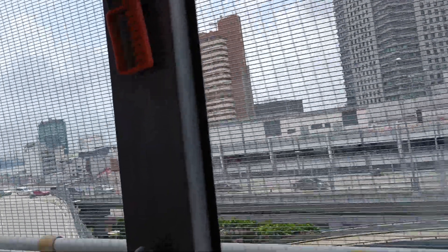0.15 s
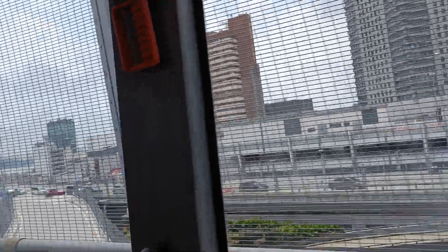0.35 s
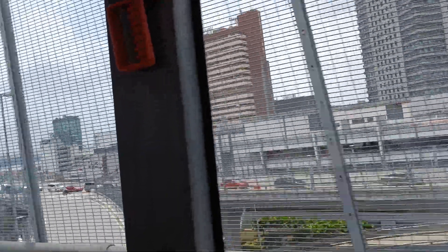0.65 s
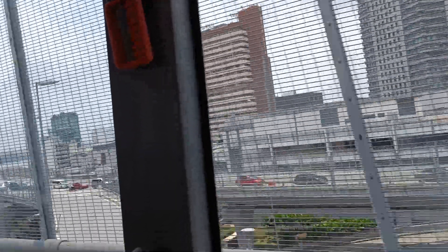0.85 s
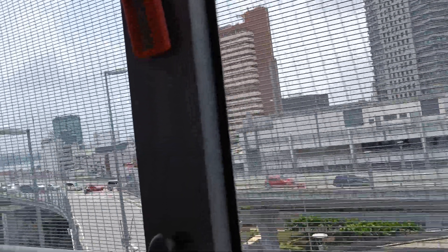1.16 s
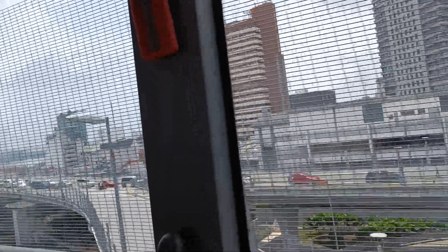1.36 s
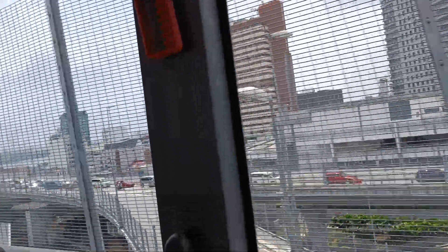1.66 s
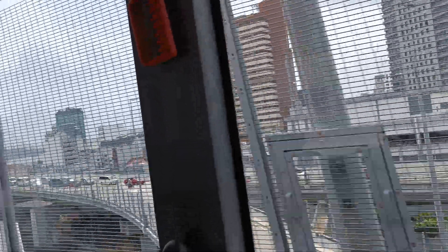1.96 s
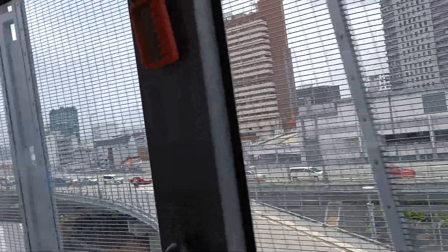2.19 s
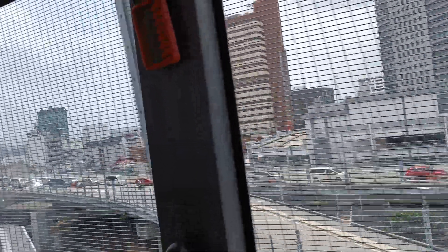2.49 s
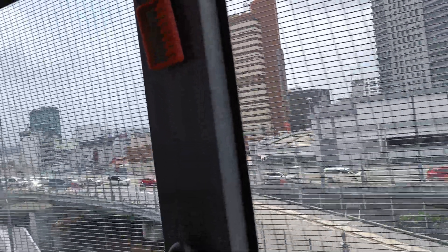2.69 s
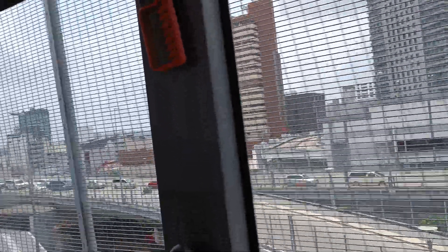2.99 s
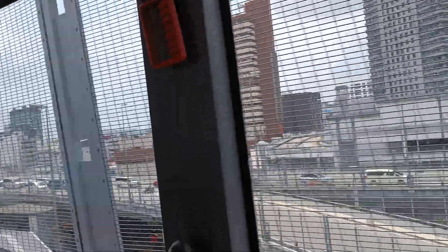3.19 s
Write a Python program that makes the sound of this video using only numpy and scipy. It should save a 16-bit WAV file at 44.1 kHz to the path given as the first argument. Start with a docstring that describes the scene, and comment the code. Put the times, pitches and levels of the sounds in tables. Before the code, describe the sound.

Inside a moving bus, a diesel engine hums steadily, slides down in pitch at a gear change, then holds low and slowly rises, with tyre rumble and small window rattles; stereo microphones in the cabin.

```python
"""Inside a moving bus: a six-cylinder diesel drops its revs at a gear change, then pulls again.
The engine is a stack of wavering sines on the firing cycle, lifted where the cabin booms; gear, turbo and
two more thin tones are single sines. Suspension, drone, tyres, body and air are shaped noise, and panels
are noise sung through narrow resonances. A small fitting and loose window frames rattle as clusters of
contacts with a short cabin echo. Two microphones differ in colour and phase."""
import sys
import numpy as np
from scipy import signal
from scipy.fft import rfft, irfft, next_fast_len
from scipy.io import wavfile
from scipy.ndimage import uniform_filter1d, map_coordinates

SR = 44100
rng = np.random.default_rng(int(sys.argv[2]) if len(sys.argv) > 2 else 0)


def undo_db(level):
    """Turn decibels back into plain size, where 20 dB means ten times bigger."""
    steps = np.asarray(level, float) / 20
    return 10 ** steps


def inscribe(sig):
    """Save sig as 16-bit PCM at rate SR to the path in sys.argv[1].

    A 1-D sig is mono; a 2-D sig holds one channel per row.
    Samples are clipped to [-1, 1] before scaling.
    """
    pcm = np.round(np.clip(np.atleast_2d(sig).T, -1, 1) * 32767)
    wavfile.write(sys.argv[1], SR, pcm.astype(np.int16))


N = 147294
CYLINDERS = 6


def unit(x):
    """Scaled to rms 1."""
    return x / np.sqrt(np.mean(x ** 2) + 1e-20)


def along(points, hz):
    """Reads (Hz, value) points on a log frequency axis."""
    f, v = np.transpose(points)
    return np.interp(np.log(hz + 1), np.log(f + 1), v)


def curves(rows):
    """One value per sample for each column after the time."""
    s, *cols = np.transpose(rows)
    return [np.interp(np.arange(N) / SR, s, c) for c in cols]


def wobble(rate):
    """A smooth random curve, rate knots a second."""
    return map_coordinates(rng.standard_normal(400), [np.arange(N) * rate / SR])


def filtered(x, response):
    """x shaped by a complex response of frequency."""
    m = next_fast_len(N + SR // 2)
    return irfft(rfft(x, m) * response(np.fft.rfftfreq(m, 1 / SR)), m)[..., :N]


def resonance(f, hz, width_hz):
    """One causal resonance, gain 1 at its centre."""
    return 1j * f * width_hz / (hz * hz - f * f + 1j * f * width_hz)


def right_over_left(db):
    """Left and right gains, db apart and balanced about the middle."""
    return undo_db([[-db / 2], [db / 2]])


def pair_of(alike):
    """Two white noises that are partly the same."""
    a, b = rng.standard_normal((2, N))
    alike = np.clip(alike, 0, 1)
    return np.array([a, alike * a + np.sqrt(1 - alike ** 2) * b])


# Left-right likeness of the noise beds and panels: pitch_hz, likeness (1 = the same)
LIKENESS = [(20, .99), (45, .99), (70, .97), (125, .94), (250, .92), (500, .8), (900, .62), (1300, .5),
            (2000, .25), (4000, .08), (15000, .05)]


def rush(spectrum, patchy_db):
    """Stereo noise of a given spectrum, middle at rms 1, with time-frequency patches of random gain."""
    z = signal.stft(rng.standard_normal((2, N)), nperseg=512)[2]
    field = uniform_filter1d(rng.standard_normal(z.shape[1:]), size=6, axis=0)
    field = uniform_filter1d(field, size=12, axis=1)
    pair = signal.istft(z * undo_db(patchy_db * unit(field)), nperseg=512)[1][:, :N]

    def middle_and_side(hz):
        # the less alike the ears are, the more side signal
        width = np.tan(np.arccos(np.clip(along(LIKENESS, hz), -1, 1)) / 2)
        return undo_db(along(spectrum, hz)) * np.array([np.ones_like(width), width])

    mid, side = filtered(pair, middle_and_side)
    return np.array([mid + side, mid - side]) / np.std(mid)


# Revs and load through the gear change: time_s, firing_hz, loaded_orders_db,
# growl_db (orders 7 to 13, from just above the firing rate to about twice it)
REVS = [(0, 96.65, -20, -19.5), (.2, 96.65, -17.5, -21.5), (.36, 96.24, -23.5, -19),
        (.46, 91.04, -26.5, -16), (.62, 88.1, -23, -15.5), (.7, 84.84, -28.5, -15.5),
        (.79, 78.66, -28, -12.5), (.9, 70.5, -21.5, -19.5), (1.3, 69.48, -22, -20.5),
        (1.68, 69.19, -18.5, -22.5), (1.9, 69.25, -25, -30), (2.06, 68.55, -16.5, -18.5),
        (2.3, 69.06, -29, -23.5), (2.7, 69.48, -23, -37), (3.0, 71.22, -25.5, -22.5),
        (3.34, 74.05, -23, -23)]


def revs():
    """Firing rate, phase of the four-stroke cycle (one turn per six firings), and the two order levels."""
    firing_hz, tone_db, growl_db = curves(REVS)
    cycle = 2 * np.pi * np.cumsum(firing_hz) / SR / CYLINDERS
    return firing_hz, cycle, tone_db, growl_db


# Strength of each engine order: multiple of the four-stroke cycle, level_db
ORDER_LEVELS = {5: -9.5, 6: -1.5, 7: -15.5, 8: -12, 9: -4.5, 10: -6, 11: -7.5, 12: -4.5, 13: -8.5, 15: -12,
                18: -5.5, 24: -21}
# Booms of the cabin: pitch_hz, boost_db
CABIN_BOOMS = [(30, -18), (70, 1), (100, 0.5), (135, -8), (200, -3.34), (215, -7.5), (290, 2), (340, 0.7),
               (650, -3.7)]


def engine(cycle, firing_hz, tone_db, growl_db):
    """Each order of the uneven firing cycle wavers on its own and is lifted by the cabin's booms."""
    growling = range(7, 14)
    firing_waver_db, other_waver_db, jitter_rad = 1, 2.2, 0.2
    out = np.zeros((2, N))
    for k, order_db in ORDER_LEVELS.items():
        load_db = growl_db if k in growling else tone_db
        boom_db = along(CABIN_BOOMS, k * firing_hz / CYLINDERS)
        waver_db = firing_waver_db if k == CYLINDERS else other_waver_db
        gain = undo_db(load_db + order_db + boom_db + waver_db * wobble(9))
        phase = k * cycle + rng.uniform(0, 2 * np.pi)
        phase = phase + jitter_rad * k / CYLINDERS * wobble(5.374)
        apart = 0.021 * k * wobble(1.5)  # left and right drift apart in phase, rad
        out += np.sqrt(2) * gain * np.sin([phase + apart, phase - apart])
    return out


def whine(rows, waver_hz, flicker_db, right_db):
    """A thin tone, unsteady in pitch and level."""
    hz, db = curves(rows)
    phase = 2 * np.pi * np.cumsum(hz + waver_hz * wobble(28.24)) / SR
    level = np.sqrt(2) * undo_db(db + flicker_db * wobble(20))
    return level * np.sin(phase) * right_over_left(right_db)


# Gear whine, dying as the load is lifted: time_s, pitch_hz, level_db
GEAR_WHINE = [(0, 1109, -47), (.12, 1108, -41), (.29, 1103, -40), (.33, 1110, -55), (.6, 1110, -70)]


def gear():
    """Whine of the gears as one unsteady sine, mostly on the right."""
    return whine(GEAR_WHINE, waver_hz=4, flicker_db=4.5, right_db=15)


# Turbo whistle, falling later than the revs: time_s, pitch_hz, level_db
TURBO_WHISTLE = [(0, 13050, -90), (.35, 13200, -84), (.8, 12880, -86), (1.3, 12150, -85), (1.9, 11210, -83),
                 (2.2, 10950, -81), (2.9, 10975, -76.5), (3.34, 11030, -85)]


def turbo():
    """Faint high whistle of the turbo, gliding down, stronger on the left."""
    return whine(TURBO_WHISTLE, waver_hz=6, flicker_db=4.5, right_db=-5)


# Two thin tones, perhaps fan or pump: time_s, pitch_hz, level_db
UPPER_THIN_TONE = [(0, 1800, -48.5), (.3, 1778, -42.5), (.42, 1792, -50), (.6, 1788, -45.5), (1, 1757, -53),
                   (2.3, 1786, -58.5), (3.34, 1778, -42.5)]
LOWER_THIN_TONE = [(0, 1609, -55.5), (.8, 1595, -55.5), (2.3, 1636, -57), (3.34, 1594, -53)]


def thin_tones():
    """Two gently wavering sines, the upper near the middle and the lower to the right."""
    upper = whine(UPPER_THIN_TONE, waver_hz=3, flicker_db=2.5, right_db=0.5)
    return upper + whine(LOWER_THIN_TONE, waver_hz=3, flicker_db=1.5, right_db=13)


# Level of the suspension thuds: time_s, level_db
JOLTS = [(0, -46.5), (.2, -36), (.8, -35.5), (1.3, -38), (1.5, -43), (1.66, -17.5), (1.8, -30),
         (2.08, -29.5), (2.4, -41), (3.34, -43)]
# Colour of a thud: pitch_hz, density_db (per Hz)
THUD_COLOUR = [(4, -120), (12, -20), (20, -5), (40, 0), (50, -14), (90, -120)]


def suspension():
    """Jolts of the suspension as patchy sub-bass noise that swells and falls."""
    return undo_db(curves(JOLTS)[0] + 1.7 * wobble(8)) * rush(THUD_COLOUR, patchy_db=2.5)


# Colour of the low body drone: pitch_hz, level_db
DRONE_COLOUR = [(30, -120), (42, -25), (52, -8), (65, 0), (90, -.5), (110, -6), (135, -35), (250, -120)]


def body_drone():
    """Low drone of the body as a narrow band of patchy bass noise."""
    return undo_db(-35 + wobble(4.8)) * rush(DRONE_COLOUR, patchy_db=3.5)


# Road noise: time_s, rumble_db (tyres), roar_db (body)
ROAD_LEVELS = [(0.0, -19.5, -32), (2.13, -26, -35.5), (3.34, -21, -32)]
# Colour of the tyre rumble: pitch_hz, density_db (per Hz)
RUMBLE_COLOUR = [(62, -37), (105, 0.5), (193, -2), (236, -10), (295, -4), (442, -15), (518, -14.5),
                 (574, -19.5), (631, -11.5), (700, -27.5), (910, -45), (1540, -120)]
# Colour of the body roar: pitch_hz, density_db (per Hz)
ROAR_COLOUR = [(240, -63.5), (400, 3.5), (582, -7.5), (637, -12.5), (698, -1.5), (1090, -9.5), (1180, -4.5),
               (1540, -12), (1830, -13), (2820, -23), (4500, -33.5), (5850, -43.5), (9900, -120)]


def tyres_and_body(cycle):
    """Low tyre rumble, and a body roar that throbs with the firing and half the firing rate."""
    rumble_db, roar_db = curves(ROAD_LEVELS)
    rumble = undo_db(rumble_db + 0.5 + 0.8 * wobble(8.6)) * rush(RUMBLE_COLOUR, patchy_db=0.8)
    throb_db = 0.5 * (np.sin(CYLINDERS * cycle) + 0.84 * np.sin(3 * cycle))
    roar = undo_db(roar_db + throb_db + 0.17 * wobble(4.4)) * rush(ROAR_COLOUR, patchy_db=0.5)
    return rumble + roar


# Colour of the air hiss: pitch_hz, density_db (per Hz)
AIR_COLOUR = [(1200, -120), (2000, -7.5), (2500, -3.5), (2900, -13.5), (4040, -5.5), (4600, -15),
              (6080, -9), (6780, -9.5), (7550, -20), (8700, -26), (9600, -29), (10700, -28), (12500, -26),
              (14400, -23), (15900, -34)]


def air():
    """Smooth hiss of air as treble noise, almost steady in level."""
    return undo_db(-54.5 + 0.4 * wobble(5.8)) * rush(AIR_COLOUR, patchy_db=0.4)


# Panel resonances: pitch_hz, width_hz, level_db
PANEL_MODES = [(527.8, 51, -43.5), (643.8, 16, -48), (863.5, 74, -52), (919.5, 9.8, -54),
               (1109.5, 67, -56.5)]
# Right over left for each panel in turn: balance_db
PANEL_BALANCE = [-3.5, 7.5, 1, 1.5, 14]
# Vibration driving all the panels: time_s, boost_db
PANEL_VIBRATION = [(0, 5), (.35, 9.5), (.7, 8.5), (1, 4), (2.2, 2), (2.8, 7.5), (3.34, 5.5)]


def panels():
    """Vibration noise ringing in narrow panel resonances, each wavering in level."""
    out = np.zeros((2, N))
    for (hz, width_hz, db), right_db in zip(PANEL_MODES, PANEL_BALANCE):
        noise = pair_of(along(LIKENESS, hz))
        ring = filtered(noise, lambda f: resonance(f, hz, width_hz) ** 2)
        out += undo_db(db + 0.56 * wobble(4.7)) * unit(ring) * right_over_left(right_db)
    return out * undo_db(curves(PANEL_VIBRATION)[0])


def contacts():
    """Tiny random clicks of loose parts touching, over a continuous buzz that the two sides partly share."""
    per_s, spread_db = 900, 2
    clicks = rng.random((2, N)) < per_s / SR
    clicks = clicks * undo_db(spread_db * rng.standard_normal((2, N))) * rng.choice([-1, 1], (2, N))
    return unit(clicks) + 0.5 * pair_of(0.7)


def ringing(x, modes):
    """x through a set of resonances of alternating sign, rolled off at the top, at rms 1."""
    def response(f):
        total = sum((-1) ** k * undo_db(db) * resonance(f, hz, width_hz)
                    for k, (hz, width_hz, db) in enumerate(modes))
        return total / (1 + (f / 7400) ** 16)
    return unit(filtered(x, response))


def burst(start_s, length_s):
    """Envelope of one rattle: a quick rise, a hold and a short fade."""
    t = np.arange(N) / SR
    rise = np.clip((t - start_s) / (0.055 * length_s), 0, 1)
    fade = np.clip((start_s + length_s - t) / (0.17 * length_s) + 0.19, 0, 1)
    return rise * fade


# Ticks of a smaller loose fitting: start_s, level_db, length_s
FITTING_TICKS = [(.349, -50, 0.019), (.627, -53, 0.008), (0.756, -50, 0.018), (0.948, -50, 0.03),
                 (1.151, -56, 0.031), (1.4, -56, .02), (3.199, -53, .008)]
# Resonances of the fitting: pitch_hz, width_hz, level_db
FITTING_MODES = [(2900, 800, -4), (3700, 500, -4), (4350, 400, -2), (5300, 350, 0), (6200, 900, -5)]


def small_fitting(hits):
    """Short bursts of contacts ring the resonances of a small loose fitting."""
    level = sum(undo_db(db) * burst(start_s, length_s) for start_s, db, length_s in FITTING_TICKS)
    return level * ringing(hits, FITTING_MODES)


# Rattles of the window frames: start_s, level_db, length_s, sizzle_db (mostly above 9 kHz)
FRAME_RATTLES = [(0.772, -46, 0.012, -55), (0.788, -72.5, 0.043, -59.5), (0.808, -51, 0.015, -72.5),
                 (1.264, -62, 0.039, -74.5), (1.707, -60, 0.015, -80), (1.92, -47, 0.024, -68.5),
                 (1.991, -55.5, 0.06, -67), (2.133, -57, 0.022, -64), (2.152, -49, 0.04, -76),
                 (2.35, -64, 0.063, -67), (2.435, -42, 0.025, -54.5), (2.583, -49, 0.036, -58),
                 (2.901, -58, 0.02, -77), (2.99, -55, 0.027, -67), (3.084, -45, .028, -62.5),
                 (3.276, -59, 0.022, -81.5)]
# Resonances of a frame: pitch_hz, width_hz, level_db
FRAME_MODES = [(1800, 350, -1), (2350, 300, 1), (6450, 250, -7), (6850, 180, -2)]
# Colour of the bare clack: pitch_hz, level_db
CLACK_COLOUR = [(900, -31.5), (1800, -0.5), (4000, -7.5), (6600, -18.5), (7600, -11), (9000, -34),
                (16000, -37.5)]
# Colour of the sizzle: pitch_hz, level_db
SIZZLE_COLOUR = [(5000, -120), (7500, -25), (9200, -10), (10300, -1), (11500, 0), (12800, -5), (14000, 0),
                 (16000, 0)]


def window_frames(hits):
    """Bumps shake out quick clusters of contacts: a clack, the ringing frame and a sizzle on top."""
    low, high = np.zeros((2, N))
    for start_s, db, length_s, sizzle_db in FRAME_RATTLES:
        shape = burst(start_s, length_s)
        low += undo_db(db) * shape
        high += undo_db(sizzle_db) * shape
    clack = unit(filtered(hits, lambda f: undo_db(along(CLACK_COLOUR, f))))
    sizzle = unit(filtered(hits, lambda f: undo_db(along(SIZZLE_COLOUR, f))))
    return low * (clack + undo_db(2) * ringing(hits, FRAME_MODES)) + high * sizzle


def cabin_answer(rattle):
    """Adds a brief cabin echo: the rattle convolved with decaying noise."""
    t60_s, echo_db = 0.089, 3
    t = np.arange(SR // 4) / SR
    tail = rng.standard_normal((2, SR // 4)) * undo_db(-60 * t / t60_s)
    tail = tail / np.linalg.norm(tail[0])
    return rattle + undo_db(echo_db) * signal.fftconvolve(rattle, tail, axes=1)[:, :N]


def scene():
    """All sources in the cabin; engine and body roar share one firing cycle."""
    firing_hz, cycle, tone_db, growl_db = revs()
    tones = engine(cycle, firing_hz, tone_db, growl_db) + gear() + turbo() + thin_tones()
    noises = suspension() + body_drone() + tyres_and_body(cycle) + air()
    hits = contacts()
    rattles = cabin_answer(small_fitting(hits) + window_frames(hits))
    return tones + noises + panels() + rattles


# Level of the left microphone over the right: pitch_hz, balance_db
MICROPHONE_BALANCE = [(60, 1), (99, -1.5), (160, -0.5), (270, -1.5), (450, -2.5), (740, 1.5), (1220, -3.5),
                      (2010, -7.5), (3330, -4), (5500, -13), (9080, 0.5), (15000, -3)]
# Phase lead of the left microphone: pitch_hz, lead_rad
MICROPHONE_LEAD = [(30, 0), (100, -.08), (300, -.25), (600, -.5), (950, -.8), (1210, -3.2), (1550, -2.3),
                   (1810, -4.7), (2150, -4.3), (3010, -9), (6000, -4 * np.pi)]


def microphones(hz):
    """Colour and phase of the left and right microphones, each taking half the difference."""
    half = np.array([[0.5], [-0.5]])
    colour = undo_db(along(MICROPHONE_BALANCE, hz) * half)
    return colour * np.exp(1j * along(MICROPHONE_LEAD, hz) * half)


def roll_off(x):
    """The treble ends steeply here."""
    return signal.sosfilt(signal.butter(12, 16020, fs=SR, output="sos"), x)


def record(dry):
    """Two microphones that differ in colour and phase, the right one more open to most of the treble."""
    mix = filtered(dry, microphones)
    return roll_off(mix)


dry = scene()
out = record(dry)
inscribe(out)
```